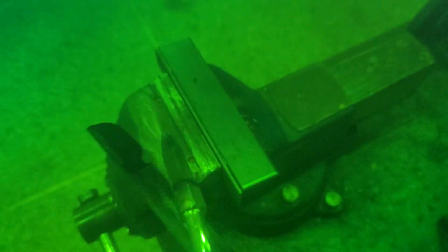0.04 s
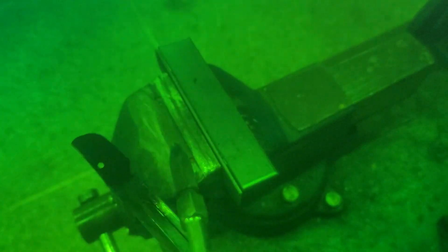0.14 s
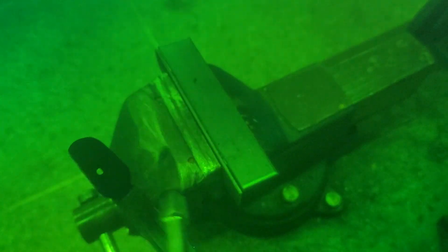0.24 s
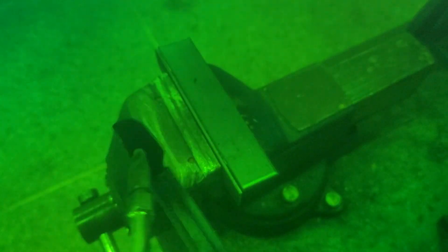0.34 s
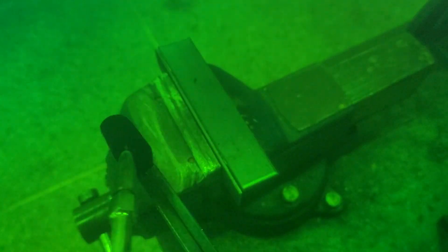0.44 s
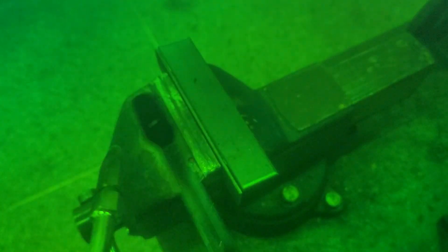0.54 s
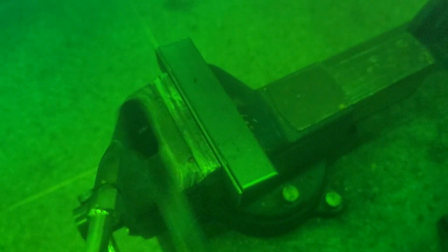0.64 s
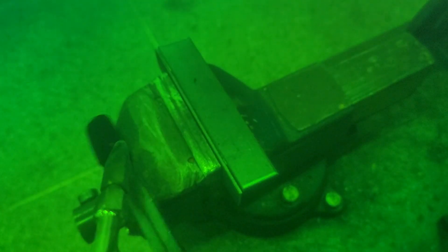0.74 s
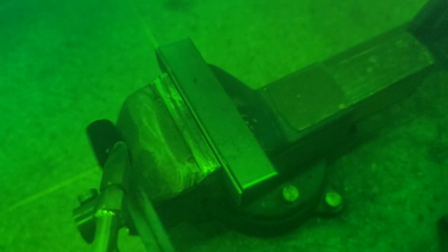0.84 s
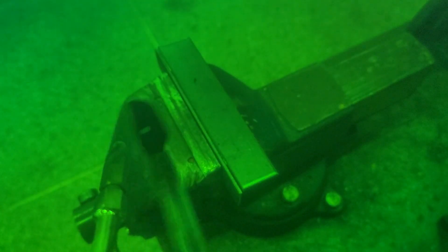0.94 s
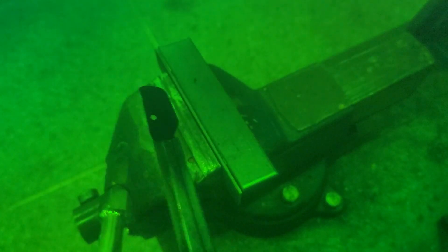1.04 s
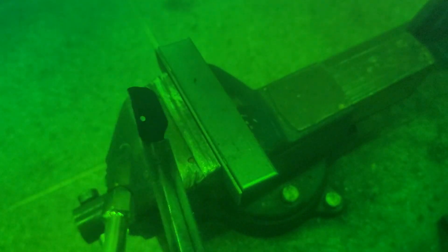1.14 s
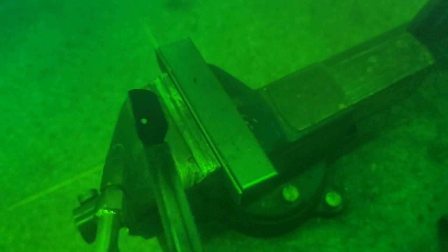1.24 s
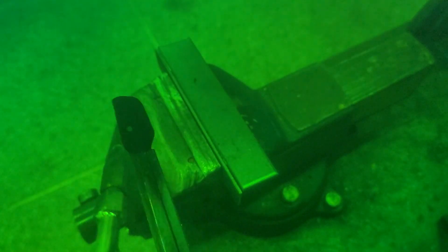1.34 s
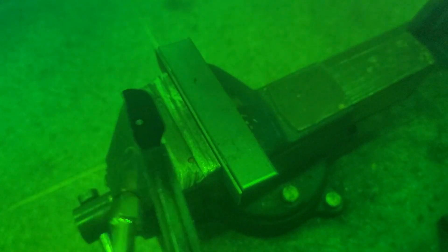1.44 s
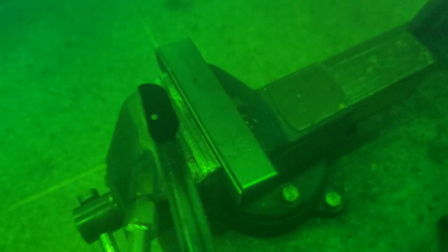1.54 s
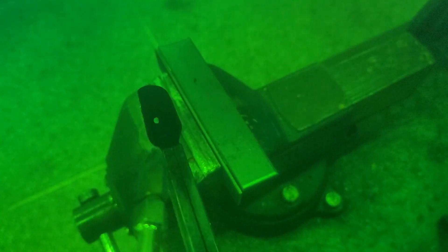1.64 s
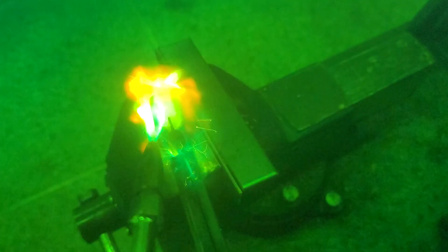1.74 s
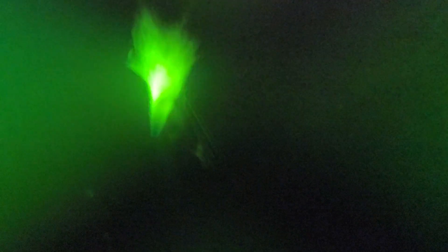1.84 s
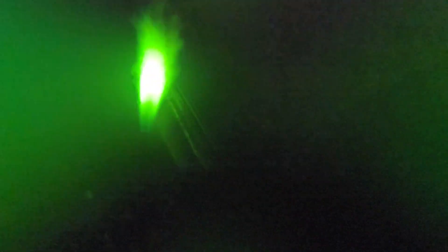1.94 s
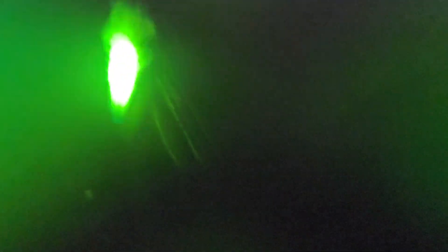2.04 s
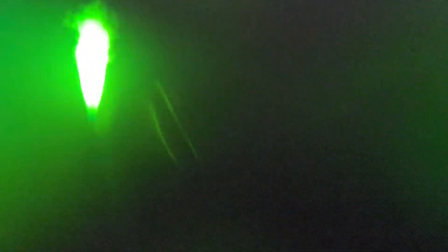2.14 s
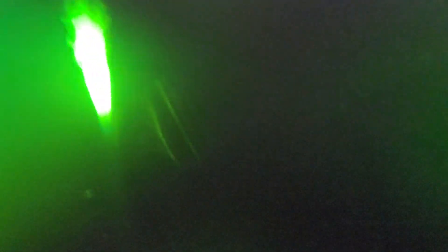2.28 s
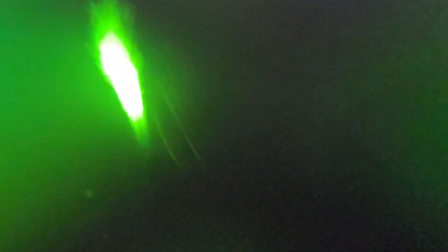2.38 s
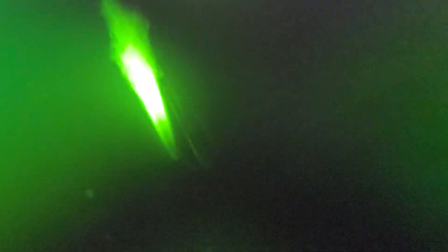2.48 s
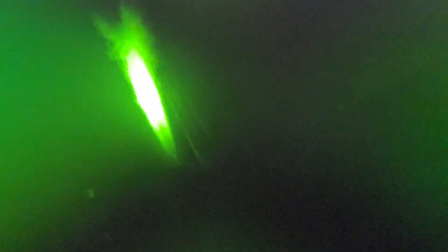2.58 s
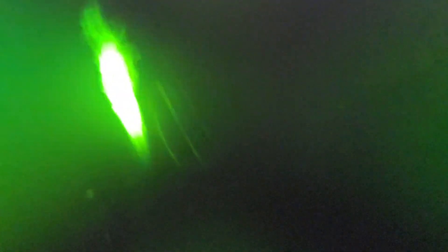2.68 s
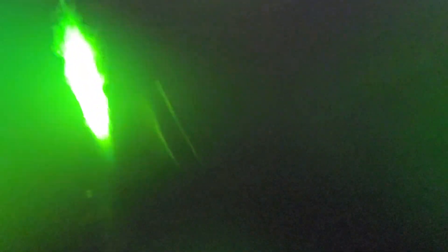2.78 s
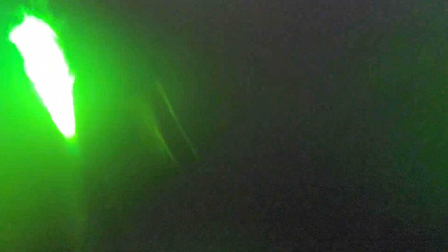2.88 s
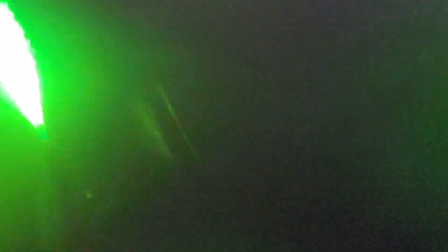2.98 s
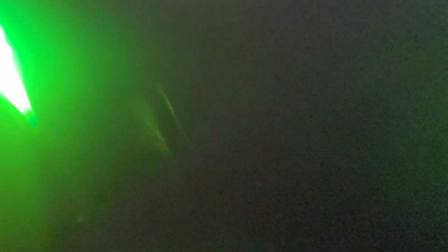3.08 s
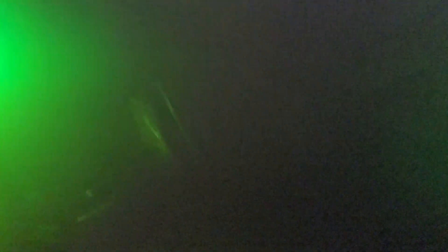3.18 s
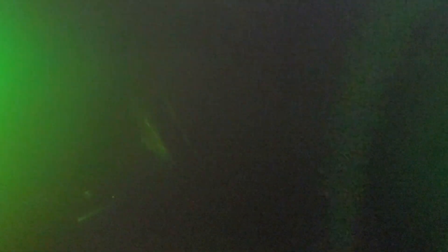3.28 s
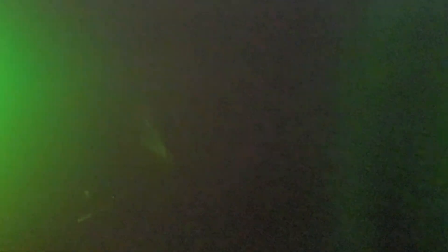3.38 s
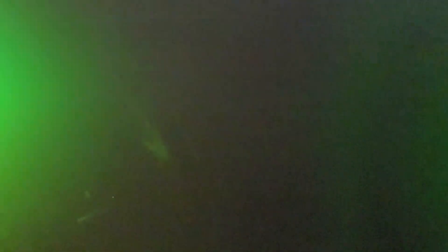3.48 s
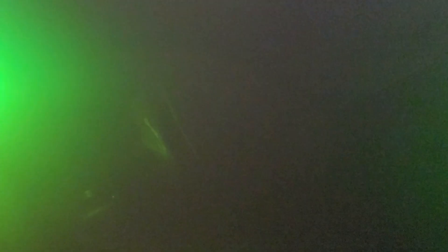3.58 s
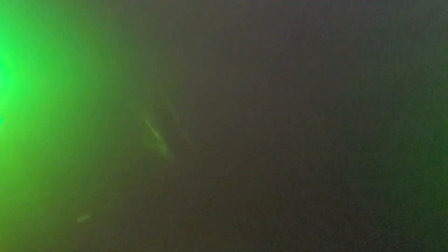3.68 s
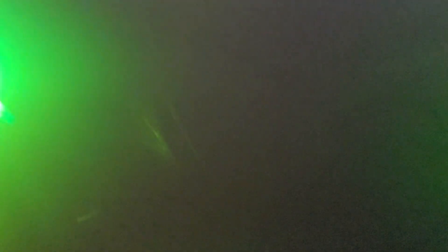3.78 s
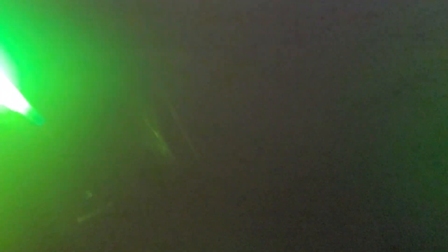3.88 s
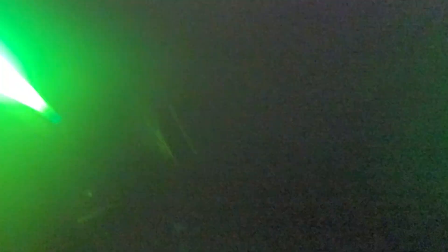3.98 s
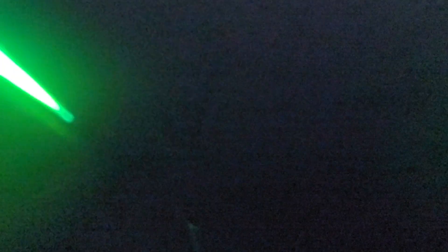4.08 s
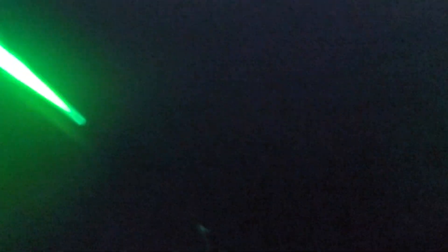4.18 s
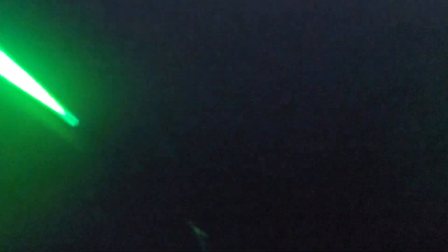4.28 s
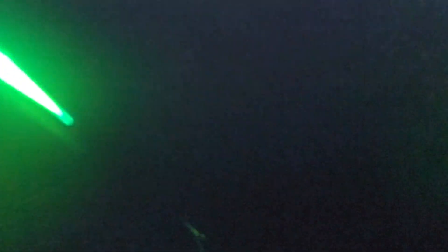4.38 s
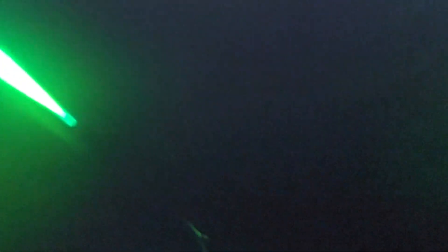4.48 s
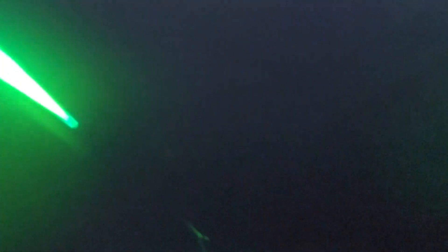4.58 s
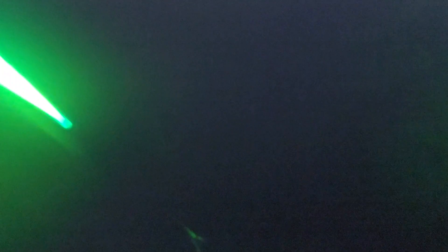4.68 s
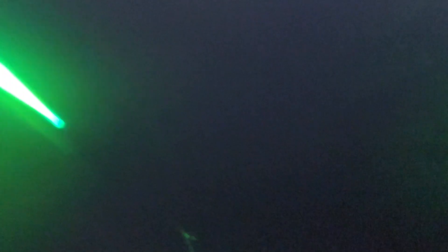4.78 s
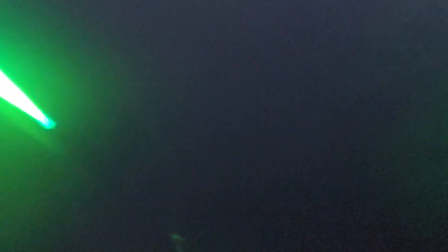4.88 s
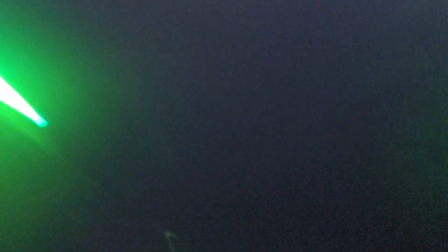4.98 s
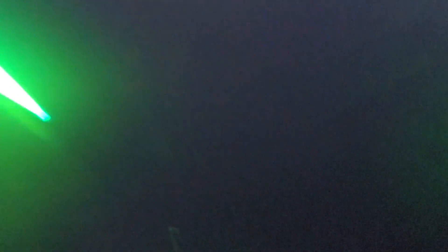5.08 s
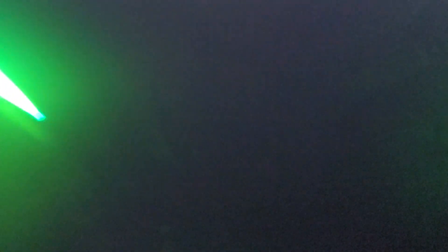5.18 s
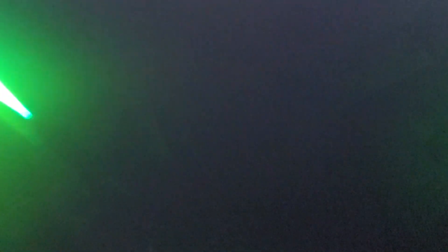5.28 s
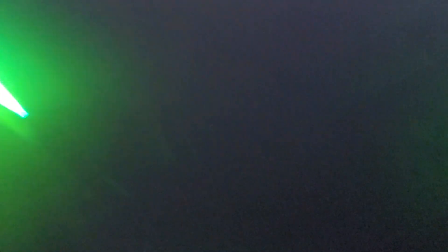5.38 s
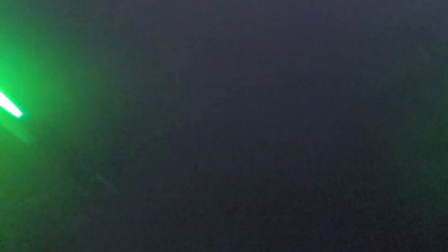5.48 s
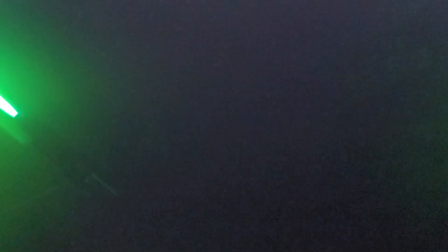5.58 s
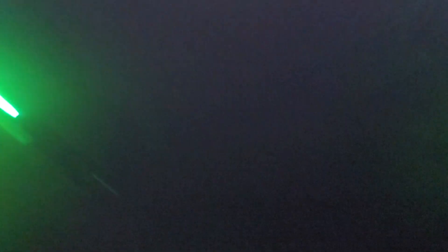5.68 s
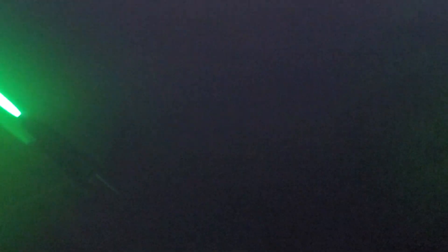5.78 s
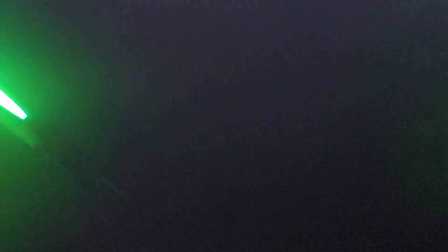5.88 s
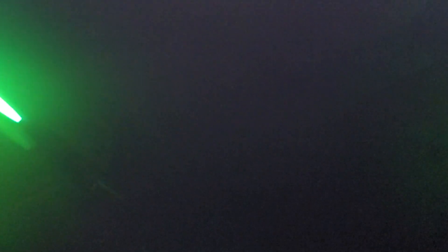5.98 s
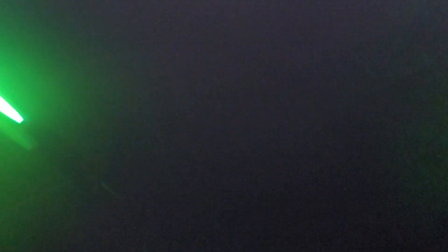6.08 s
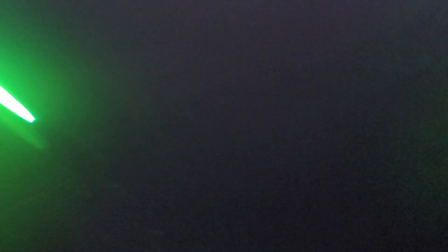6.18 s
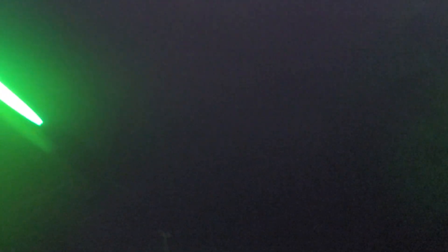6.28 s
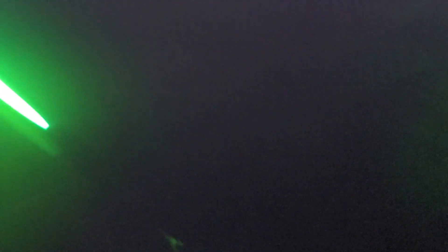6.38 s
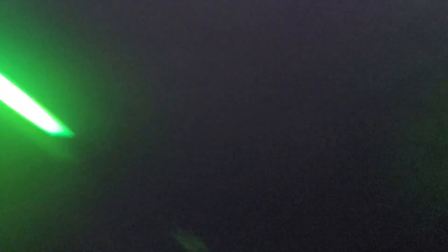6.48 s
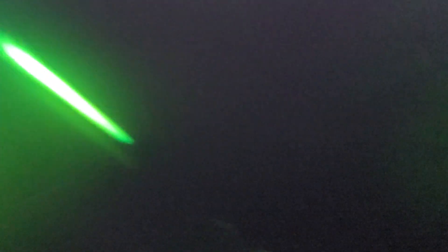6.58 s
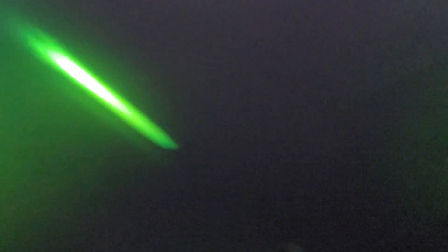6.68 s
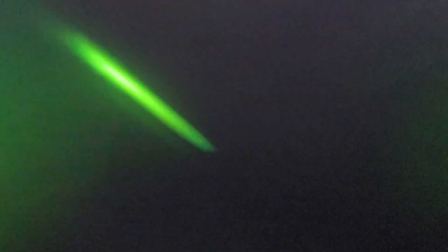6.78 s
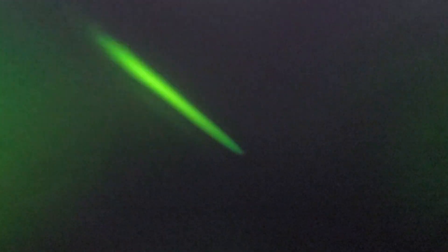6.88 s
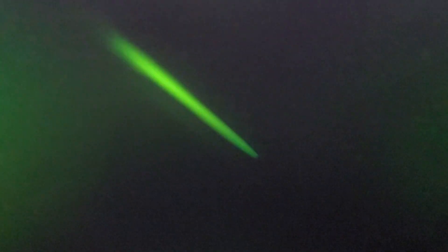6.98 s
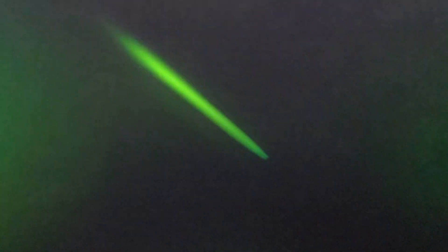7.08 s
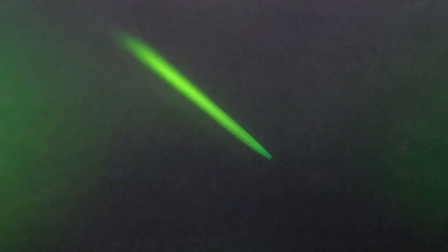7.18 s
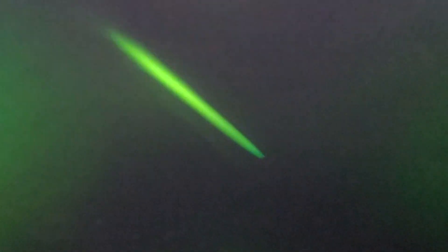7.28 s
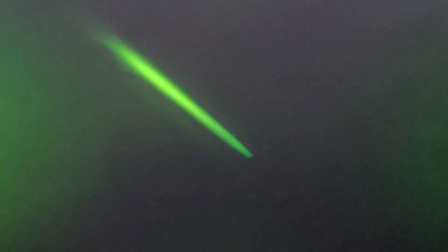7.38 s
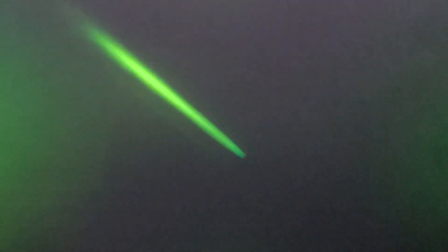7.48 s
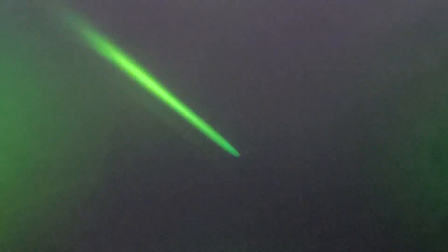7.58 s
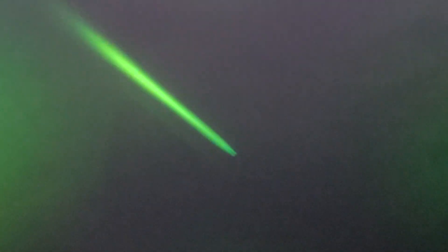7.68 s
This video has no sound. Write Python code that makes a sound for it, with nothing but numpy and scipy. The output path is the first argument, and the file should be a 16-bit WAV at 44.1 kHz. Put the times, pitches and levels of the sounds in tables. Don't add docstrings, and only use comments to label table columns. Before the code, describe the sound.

Close behind a welding mask, a steel striker clacks several times in an echoing, hard-walled workshop. Faint gas begins to hiss and lights with a sharp pop. A loose flame flutters and roars, swelling and dipping, with another loud click. Oxygen then bursts in as a bright, shrieking hiss, which gasps when trimmed and settles into a steady jet. The stereo flame drifts from front to left.

```python
import sys
import numpy as np
from scipy import signal
from scipy.fft import rfft, irfft, next_fast_len
from scipy.io import wavfile

SR = 44100
rng = np.random.default_rng(int(sys.argv[2]) if len(sys.argv) > 2 else 0)


def digitize_waveform(pressure):
    field = np.atleast_2d(pressure).T
    bounded = np.clip(field, -1, 1)
    quanta = np.round(bounded * 32767).astype(np.int16)
    wavfile.write(sys.argv[1], SR, quanta)


def volts_from_decibels(level):
    exponent = np.asarray(level, float) / 20
    return 10 ** exponent


N = 340893
LEAD = SR // 4
SHRIEK_S, SHRIEK_RISE_S = 4.03, 0.055


def evened(x):
    return x / np.sqrt(np.mean(x ** 2) + 1e-20)


def read(points, hz, column=1):
    table = np.transpose(points)
    return np.interp(np.log(hz + 1), np.log(table[0] + 1), table[column])


def tipped(colour, size, treble_db=0):
    hz = np.fft.rfftfreq(size, 1 / SR)
    octaves = np.clip(np.log2(hz / 2500 + 1e-9), 0, 1.5)
    return volts_from_decibels(read(colour, hz) + treble_db * octaves)


def hiss(colour, size, treble_db=0):
    padded = next_fast_len(size, True)
    spectrum = rfft(rng.standard_normal(size), padded) * tipped(colour, padded, treble_db)
    return evened(irfft(spectrum, padded)[:size])


def ramp(t, start, length):
    return np.clip((t - start) / length, 0, 1)


def follow(t, curve, **ends):
    return np.interp(t, *np.transpose(curve), **ends)


def add(mix, s, sound):
    part = mix[..., LEAD + round(s * SR):][..., :sound.shape[-1]]
    part += sound[..., :part.shape[-1]]


# (time [s], level [dB])
FUEL = [(1.81, 7.5), (2.0, 4), (2.25, -1.5), (2.83, 1.5), (3.07, -1.5), (3.8, 1.2), (3.99, 2.5),
        (4.2, -0.6), (5.3, -.6), (5.65, -5), (5.97, 0), (6.4, -0.3), (6.95, 2.5), (7.16, 2), (7.4, 1),
        (7.72, 1.5)]
# (time [s], level [dB])
OXYGEN = [(1.87, -38), (2.26, -38), (2.8, -31), (3.3, -22), (3.7, -27), (3.89, -20), (3.99, -11.5),
          (4.04, -9), (4.08, 1.3), (4.79, 3), (5.2, .2), (5.36, 2.2), (5.6, 3), (5.74, .8), (5.97, -3),
          (6.3, -3.5), (6.65, 0.1), (7.72, 1)]
# (settled [dB], share of fuel [dB/dB], share of oxygen [dB/dB], at shriek [dB], at choke [dB])
STREAMS = [
    (-28, 0.98, 0.0073, -2, -1.5),
    (-27.5, 0.89, 0.036, 1.5, -3.5),
    (-28.5, .4, 0.32, 12.5, -13),
    (-19.5, .05, 1, .1, -9.5),
]


def valves(t):
    lit_s, catch_s, spread_s, unlit_db = 1.745, .028, .068, -42
    whoosh_s, whoosh_width_s, whoosh_db = 1.81, .035, 10
    cough_s, cough_width_s = 4.035, .05
    cough_stream_db, cough_jet_db = 10, 4
    shriek_end_s, shriek_fall_s, shriek_sag_db = 5.37, .16, -2
    choke_s, choke_dip_s, choke_back_s = 5.738, .017, .18
    rumble_db, stiffen, lazy_db, shriek_rumble_db = -8.5, .31, -45, 5

    fuel, oxygen = follow(t, FUEL), follow(t, OXYGEN)
    shriek = ramp(t, SHRIEK_S, SHRIEK_RISE_S) - ramp(t, shriek_end_s, shriek_fall_s)
    choke = ramp(t, choke_s, choke_dip_s) - ramp(t, choke_s + choke_dip_s, choke_back_s)
    roar, stream, jet, fizz = (settled + a * fuel + b * oxygen + c * shriek + d * choke
                               for settled, a, b, c, d in STREAMS)

    cough = np.exp(-((t - cough_s) / cough_width_s) ** 2)
    stream = stream + cough_stream_db * cough
    jet = jet + cough_jet_db * cough
    jet = jet + shriek_sag_db * shriek * (ramp(t, SHRIEK_S, shriek_end_s - SHRIEK_S) - .5)
    fizz = fizz + whoosh_db * np.exp(-((t - whoosh_s) / whoosh_width_s) ** 2)
    damping = stiffen * np.maximum(fizz - lazy_db, 0)
    rumble = roar + rumble_db - damping + shriek_rumble_db * shriek

    caught = unlit_db * (1 - ramp(t, lit_s, catch_s))
    spread = unlit_db * (1 - ramp(t, lit_s, spread_s))
    return rumble + .5 * caught, roar + caught, stream + spread, jet + spread, fizz + spread


# (frequency [Hz], density [dB per Hz])
RUMBLE = [(20, -11), (45, -13), (70, 12), (110, -1.5), (200, -18.5)]
# (frequency [Hz], density [dB per Hz])
ROAR = [(20, -30), (45, -47), (75, -7), (130, 1), (260, -3), (480, 2), (800, -1), (1300, -12),
        (3000, -41.5)]
# (frequency [Hz], density [dB per Hz])
STREAM = [(400, -26), (900, -1.5), (1700, 1.5), (2600, -3.5), (5000, -14), (9000, -28), (16000, -42)]
# (frequency [Hz], density [dB per Hz])
JET = [(1500, -53.5), (2200, -13.5), (2700, -1), (4000, -1.5), (6000, 3.5), (7500, -3.5), (9500, -7.5),
       (16000, -54)]
# (frequency [Hz], density [dB per Hz])
FIZZ = [(2000, -35), (4000, -12), (6000, -2.5), (8500, -2), (11000, 0), (13500, -1), (16000, -1.5)]
FLUTTER_DB = [0.62, 1.4, 0.99, 1.02, 1]


def flame():
    lit_s, flutter_hz = 1.745, 39
    t = np.arange(N) / SR
    flutter = hiss([(.5, 0), (flutter_hz, -8), (4 * flutter_hz, -40)], N)
    fire = np.zeros(N)
    for colour, db, depth in zip((RUMBLE, ROAR, STREAM, JET, FIZZ), valves(t), FLUTTER_DB):
        fire += hiss(colour, N) * volts_from_decibels(db + depth * flutter)
    return volts_from_decibels(-1.0) * (t > lit_s) * fire


# (time [s], right ear late [ms], left over right [dB])
PATH = [(1.77, 0.136, -1), (1.99, .16, 2), (2.2, .21, 3), (2.56, .13, 1.5), (2.86, .22, 3.5),
        (3.13, 0.26, 6.5), (3.27, .35, 6), (3.42, 0.37, 5), (3.67, .29, 5.5), (3.99, 0.25, 5.5),
        (4.22, .23, 4), (5.3, .275, 4.8), (6.15, 0.28, 7), (6.52, .27, 7), (6.8, .13, 4), (6.97, .084, 2.5),
        (7.2, .072, 2), (7.71, .105, 3.5)]
# (ear [0 left, 1 right], delay [ms], delay slide [ms/ms], gain slide [1/ms], gain [ratio])
ECHOES = [(0, .57, .6, -.05, .2), (0, 1.86, .05, -.4, .2), (0, 2.07, .05, -.1, -.1),
          (1, .37, .0, -.4, -.07), (1, .63, .0, .0, .14), (1, .86, .0, -.1, -.08), (1, 1.97, -1, .2, -.26)]
# (frequency [Hz], right trails [rad])
BEND = [(60, .25), (200, .45), (350, .95), (900, 1.05), (1500, .55), (2150, -.2), (3300, .65), (5000, .3),
        (7000, .45), (8300, 2.2), (10200, -.4), (15000, -.6)]
# (frequency [Hz], share of the left-right gap [ratio])
SHADE = [(60, 0), (180, .1), (420, 1.3), (800, 1), (1500, .7), (2150, -.2), (3000, .45), (4500, 1),
         (5300, .4), (8000, 1.1), (15000, 1.1)]
# (frequency [Hz], share held back [ratio])
BODY = [(400, .35), (2300, .4), (3400, .02)]


def ears(x):
    s, late_ms, gap_db = np.transpose(PATH)
    hz, t, z = signal.stft(x, SR, nperseg=1024, noverlap=768)
    turn = -2j * np.pi * hz[:, None] / 1000
    late = np.interp(t, s, late_ms)
    small = (hz / np.hypot(hz, 260))[:, None] ** 2
    paths = np.ones((2, *z.shape), complex)
    for ear, ms, slide, fade, gain in ECHOES:
        paths[ear] += small * (gain + fade * late) * np.exp(turn * (ms + slide * late))
    gap = volts_from_decibels(read(SHADE, hz)[:, None] * np.interp(t, s, gap_db) / 2)
    held_back = read(BODY, hz)[:, None] * np.maximum(.27 - late, 0)
    bend = read(BEND, hz)[:, None]
    paths[0] *= gap
    paths[1] *= np.exp(turn * (late + held_back) - 1j * bend) / gap
    return signal.istft(z * paths, SR, nperseg=1024, noverlap=768)[1][:, :N]


# (frequency [Hz], gain [dB])
SPREAD = [(100, -10), (300, -8), (700, -10), (2000, -14), (3000, -7), (4000, -6), (8000, -5), (15000, -5)]


def flame_to_walls(fire):
    lazy_db = 2.5 * (1 - ramp(np.arange(N) / SR, SHRIEK_S, SHRIEK_RISE_S))
    size = next_fast_len(N, True)
    return irfft(rfft(fire * volts_from_decibels(lazy_db), size) * tipped(SPREAD, size), size)


def pulse(peak_db, hz):
    turns = np.arange(0, 2, hz / SR)
    return -volts_from_decibels(peak_db) * np.sin(2 * np.pi * turns) * np.hanning(len(turns))


# (peak [dB], frequency [Hz])
POP = (-4, 510)
# (peak [dB], frequency [Hz])
THUMP = (-25, 48)


def ignite(near, send):
    pop_s, thump_s = 1.7745, 1.759
    add(near, pop_s, pulse(*POP))
    add(near, thump_s, pulse(*THUMP))
    add(send, pop_s, volts_from_decibels(-15) * pulse(*POP))


# (frequency [Hz], density [dB per Hz])
STEEL = [(300, -45), (600, -15), (1100, -5), (1600, 5), (2200, -3.5), (3100, -5), (3800, -2), (5000, -9.5),
         (7000, -9), (8300, -19.5)]


def click(peak_db, treble_db, gap_db, send_db):
    rattle_ms, rise_s = 8, .00062
    lead_ms_per_db = .05
    t = np.arange(1024) / SR
    tip_db = .5 * (treble_db + 16.5)
    common, *own = [hiss(STEEL, t.size, tip_db) for _ in range(3)]
    envelope = np.minimum(t / rise_s, 1) ** 2 * np.exp(-t * 2800 / rattle_ms)
    rattle = (common + .5 * np.array(own)) * envelope
    rattle = signal.lfilter(*signal.butter(2, 550, "high", fs=SR), rattle)
    balance = volts_from_decibels([[gap_db / 2], [-gap_db / 2]])
    rattle *= volts_from_decibels(peak_db) * balance / abs(rattle).max(axis=1, keepdims=True)
    lag = round(lead_ms_per_db * gap_db * SR / 1000)
    rattle = np.array([np.roll(rattle[0], max(-lag, 0)), np.roll(rattle[1], max(lag, 0))])
    average = np.roll(irfft(tipped(STEEL, t.size, tip_db)), 100)
    return rattle, volts_from_decibels(send_db) * evened(average) * np.std(rattle)


# (time [s], peak [dB], treble [dB], left over right [dB], room send [dB])
CLICKS = [(0.0527, -7.5, -21, 0, -11), (0.3662, -17, -17, .6, -5), (0.647, -39, -33, -4, -4),
          (0.8763, -35, -33, -1.5, -8.5), (1.0760, -37, -15, -3.5, -9), (1.088, -33.5, -11, -0.5, -1),
          (1.1036, -31, -9, -1, -8), (1.1296, -3, -7, -1, -7), (1.3063, -6.5, -17, 2.5, -17.5),
          (1.3830, -30, -21, -3.5, -10), (1.7530, -32, -9.5, -2, -7), (1.7722, -2.5, -19, -2.5, -7),
          (1.9690, -12, -11, -1.5, -12), (2.7860, -6.5, -23, -4.5, -9)]
# (peak [dB], treble [dB], left over right [dB], room send [dB])
EARLIER = (-7, -11.5, 5.5, -3.5)


def strike(near, send):
    for s, *shape in [(-.08, *EARLIER), *CLICKS]:
        rattle, average = click(*shape)
        add(near, s, rattle)
        add(send, s, average)


# (frequency [Hz], density [dB per Hz])
SCUFF = [(500, -17.5), (1400, 4), (3800, -7), (7000, -9), (9000, -19.5), (16000, -24)]
# (time [s], length [s], level [dB], treble [dB])
SCUFFS = [(0.439, .07, -45.5, 8), (0.636, 0.046, -47, -7), (0.725, 0.066, -56.5, 0),
          (1.449, 0.086, -43.5, 5), (1.664, 0.075, -41.5, -2)]


def brush(near):
    for s, length, db, treble_db in SCUFFS:
        size = 2 * round(length * SR / 2)
        rub = np.array([hiss(SCUFF, size, treble_db) for _ in near])
        add(near, s, volts_from_decibels(db) * np.hanning(size) * rub)


# (time [s], level [dB])
GAS = [
    (1.05, -79),
    (1.2, -51),
    (1.45, -47),
    (1.74, -45),
    (1.8, -56),
    (1.9, -95),
]


def unlit_gas():
    level = volts_from_decibels(follow(np.arange(N) / SR, GAS, left=-120))
    return level * np.array([hiss(SCUFF, N) for _ in range(2)])


# (frequency [Hz], decay by 60 dB [s])
WALLS = [(200, 0.36), (500, 0.97), (1400, 1.33), (3600, 1.37), (7000, 0.85), (12000, 0.63)]
# (frequency [Hz], left-right likeness [ratio])
WALL_SAME = [(60, 0.63), (200, 0.44), (400, 0.1), (900, 0.017)]


def workshop(x):
    hop = 128
    frames, hz = 2 * SR // hop, np.fft.rfftfreq(512, 1 / SR)
    a, b, c, d = rng.standard_normal((frames, 257, 4)).T
    same = np.clip(read(WALL_SAME, hz), 0, 1)[:, None]
    left = a + 1j * b
    right = same * left + np.sqrt(1 - same ** 2) * (c + 1j * d)
    decay = volts_from_decibels(-60 * np.arange(frames) * hop / SR / read(WALLS, hz)[:, None])
    tail = signal.istft(np.array([left, right]) * decay, nperseg=512, noverlap=384)[1]
    t = np.arange(tail.shape[1]) / SR
    tail *= np.clip((t - .0135) / .003, .06, 1) * (t > .003)
    tail *= 1 + .9 * np.exp(-((t - .019) / .005) ** 2)
    return signal.fftconvolve(x[None], tail / np.linalg.norm(tail[0]), axes=1)[:, :len(x)]


# (frequency [Hz], density [dB per Hz])
FLOOR = [(15, -37), (25, -1), (76, 8.5), (285, -7.5), (734, -3.5), (962, 1), (1400, -28.5), (7110, -23),
         (16000, -40)]


def background():
    shared = hiss(FLOOR, N)
    own = np.array([hiss(FLOOR, N) for _ in range(2)])
    return volts_from_decibels(-73.5) * (shared + 0.56 * own)


def scene():
    near, send = np.zeros((2, LEAD + N)), np.zeros(LEAD + N)
    fire = flame()
    add(send, 0, flame_to_walls(fire))
    ignite(near, send)
    strike(near, send)
    brush(near)
    room = (near + workshop(send))[:, LEAD:]
    return room + ears(fire) + unlit_gas() + background()


def band_limit(x):
    return signal.sosfilt(signal.butter(12, 16970, fs=SR, output="sos"), x)


# (frequency [Hz], left [dB], right [dB])
PORTS = [(200, 1.47, 2), (810, 2.1, 0.9), (930, 1, 2), (1160, 0.5, 2), (1650, 0.4, -4), (2010, -2, -4),
         (2800, -1.36, -1.05), (4650, -0.25, -1.5), (5960, -1.5, -1.5), (7660, 1.95, 2), (8000, 2, -5.5),
         (10000, 1.4, 1.2), (15700, -2, -3)]


def record(dry):
    edge_hz = 15780
    size = next_fast_len(N + 4096)
    hz = np.fft.rfftfreq(size, 1 / SR)
    colour = volts_from_decibels([read(PORTS, hz, column=1), read(PORTS, hz, column=2)])
    edge = volts_from_decibels(-70 * np.clip((hz - edge_hz) / 150, 0, 1))
    coloured = irfft(rfft(dry, size) * colour * edge, size)[:, :N]
    return band_limit(np.clip(coloured, -1, 1))


dry = scene()
out = record(dry)
digitize_waveform(out)
```